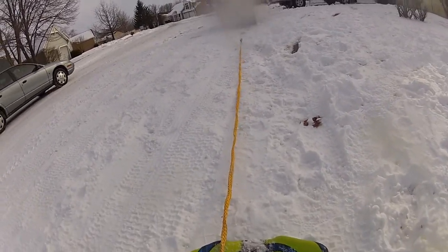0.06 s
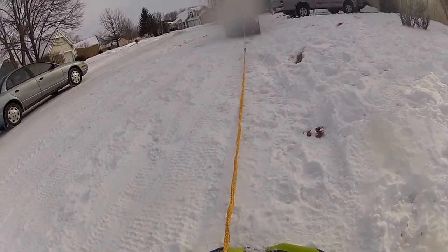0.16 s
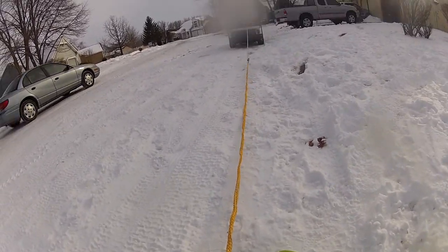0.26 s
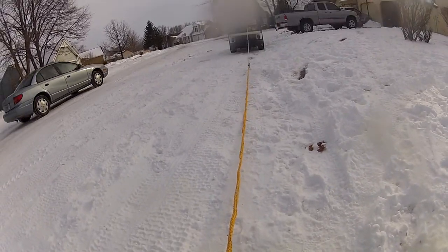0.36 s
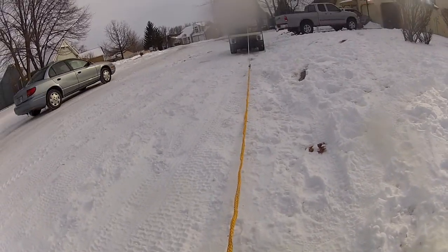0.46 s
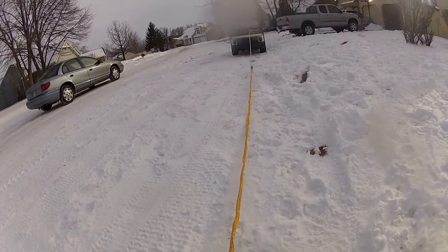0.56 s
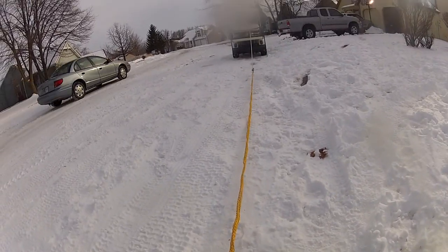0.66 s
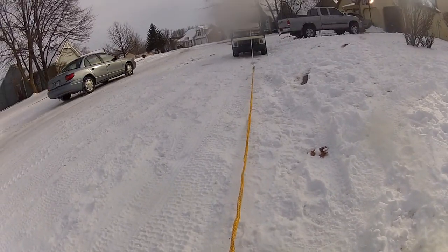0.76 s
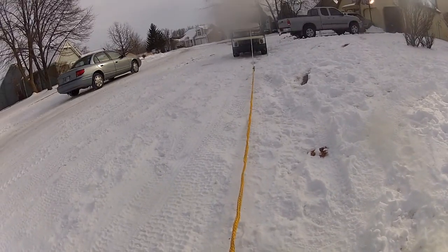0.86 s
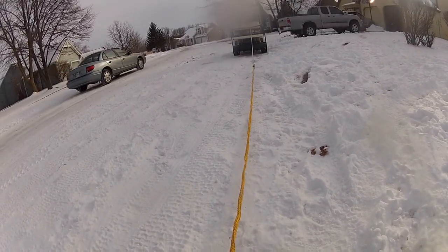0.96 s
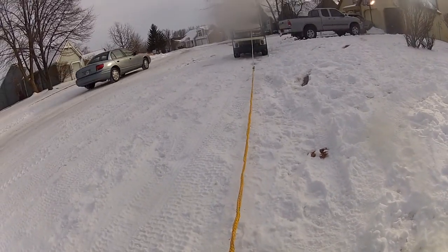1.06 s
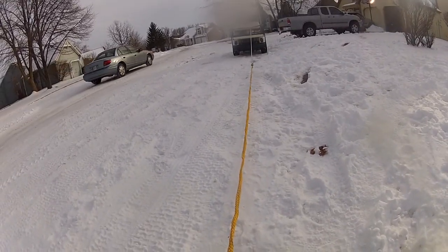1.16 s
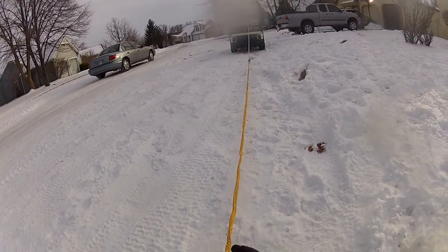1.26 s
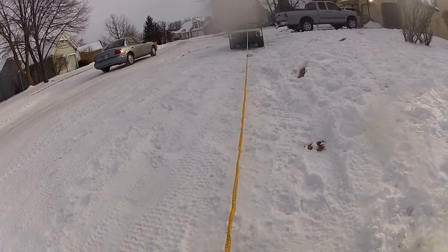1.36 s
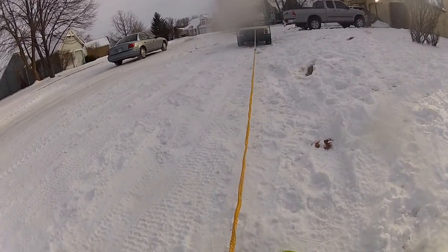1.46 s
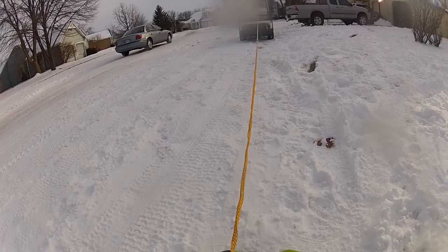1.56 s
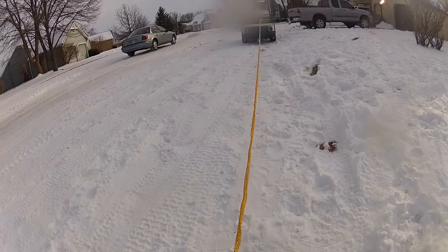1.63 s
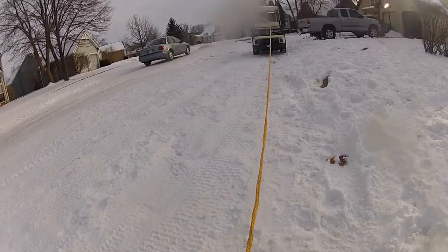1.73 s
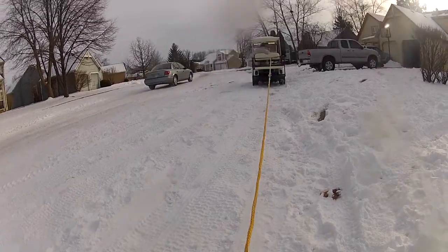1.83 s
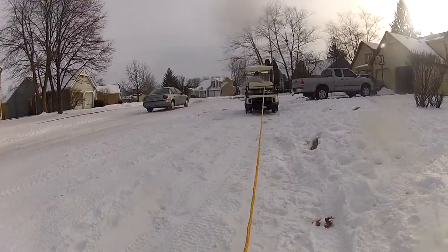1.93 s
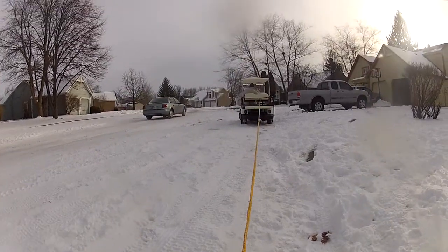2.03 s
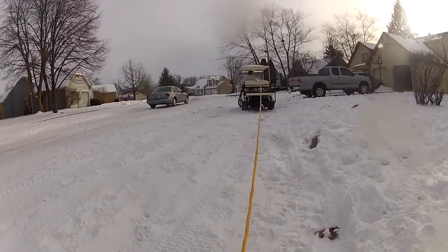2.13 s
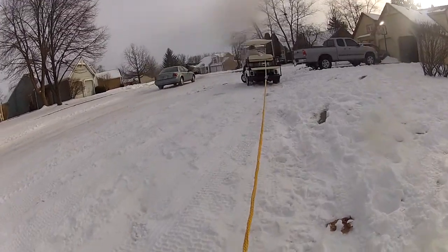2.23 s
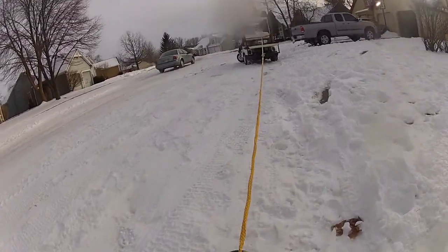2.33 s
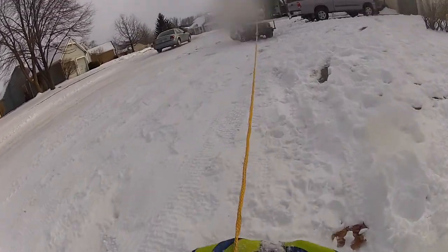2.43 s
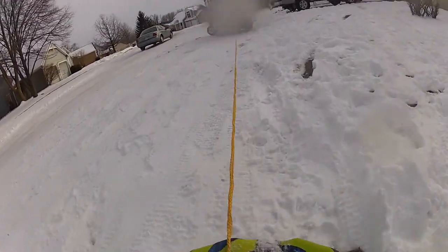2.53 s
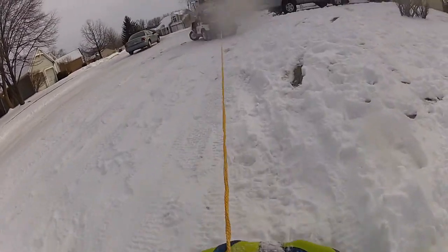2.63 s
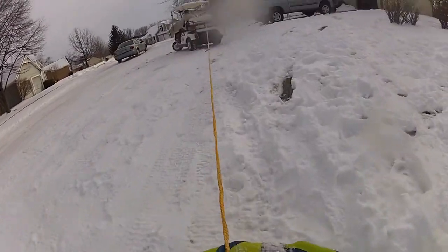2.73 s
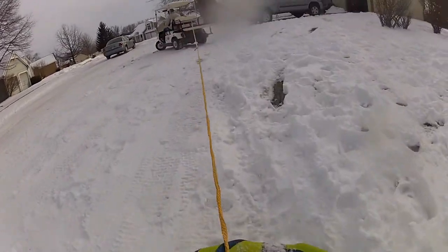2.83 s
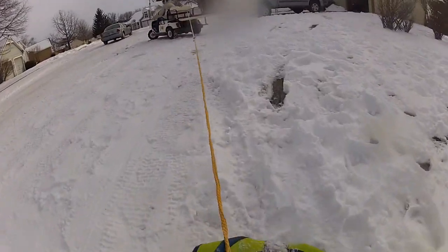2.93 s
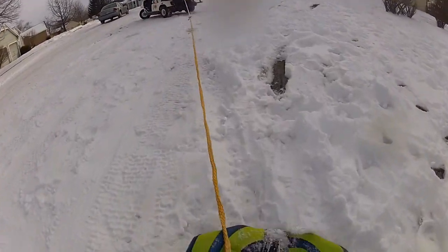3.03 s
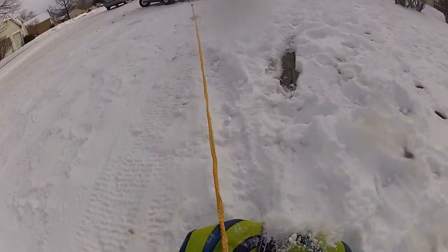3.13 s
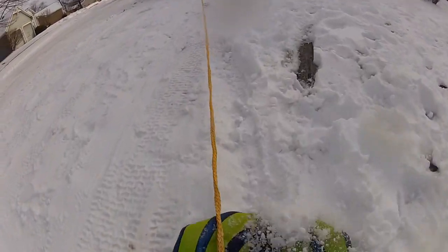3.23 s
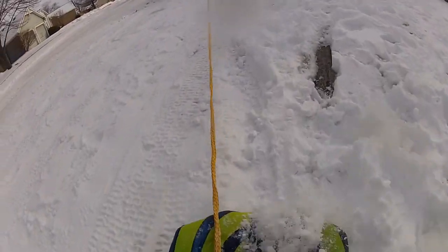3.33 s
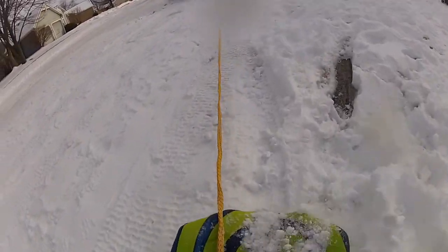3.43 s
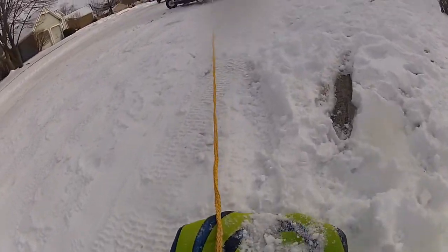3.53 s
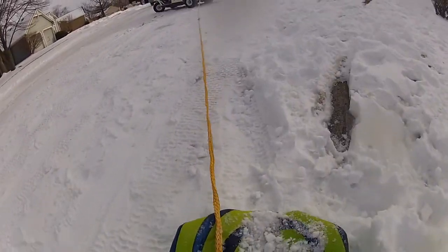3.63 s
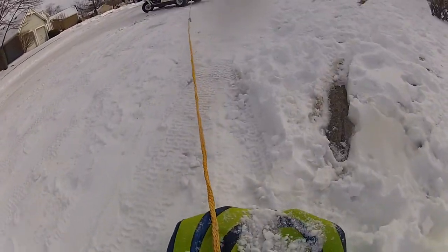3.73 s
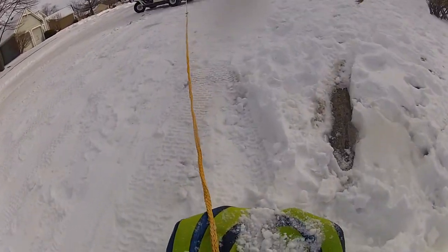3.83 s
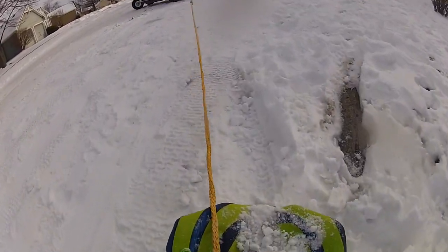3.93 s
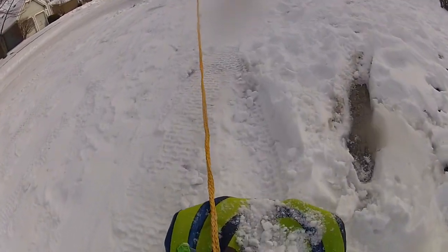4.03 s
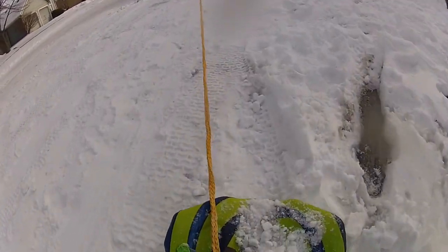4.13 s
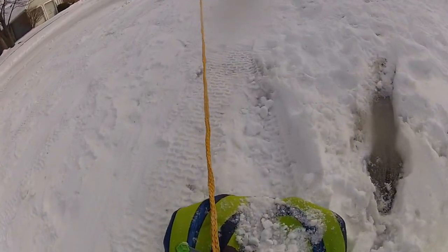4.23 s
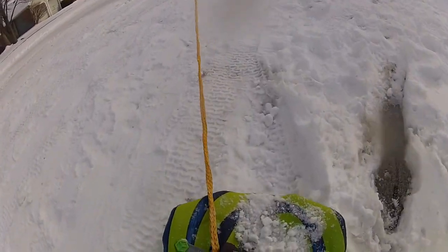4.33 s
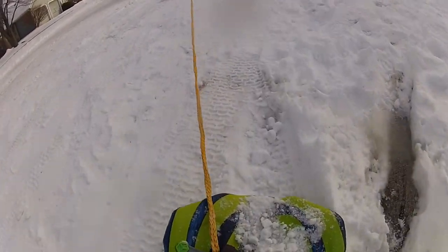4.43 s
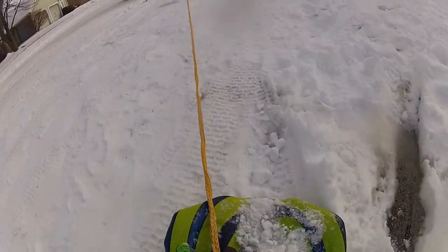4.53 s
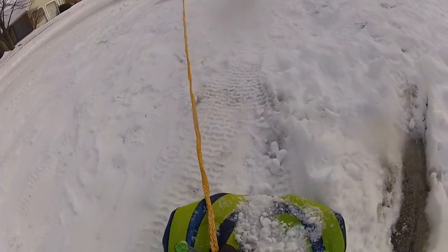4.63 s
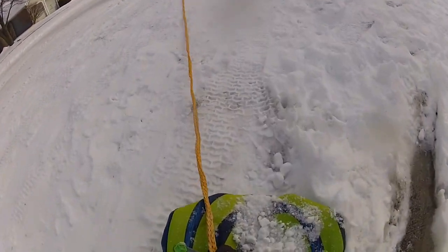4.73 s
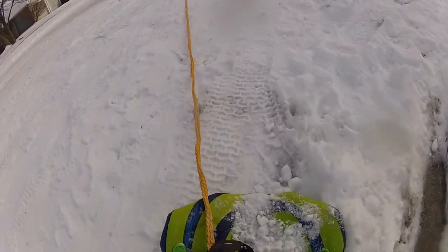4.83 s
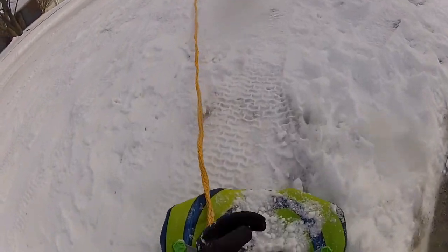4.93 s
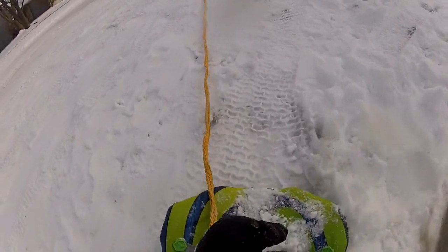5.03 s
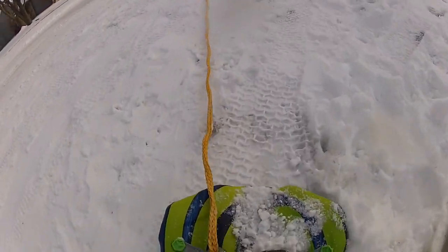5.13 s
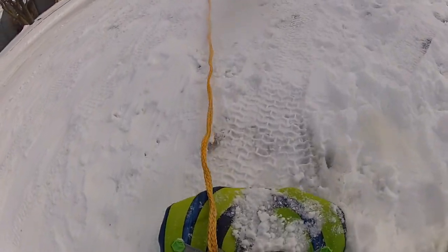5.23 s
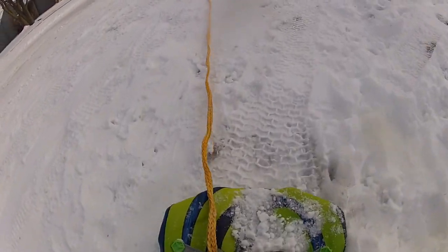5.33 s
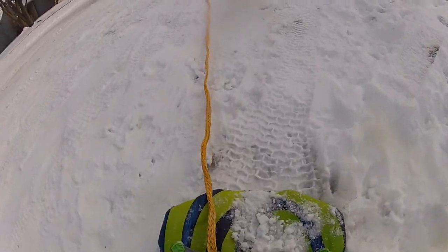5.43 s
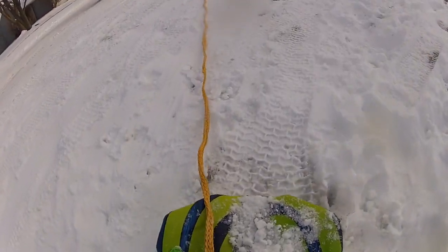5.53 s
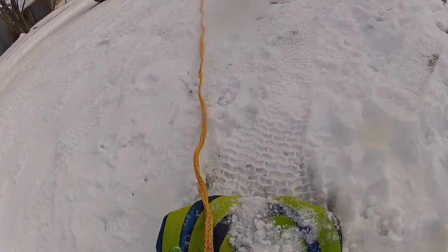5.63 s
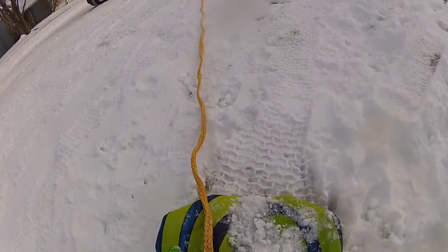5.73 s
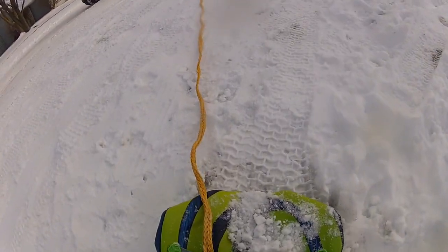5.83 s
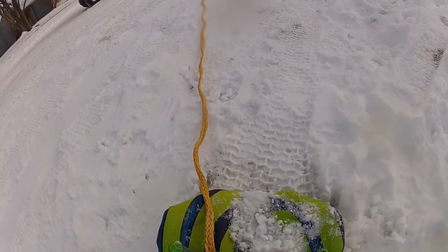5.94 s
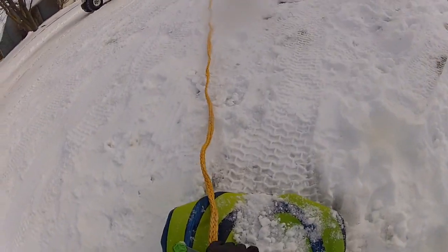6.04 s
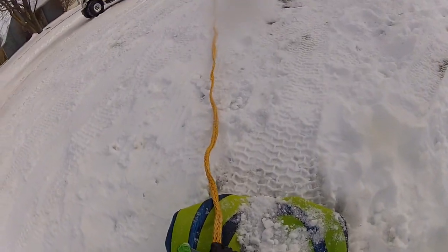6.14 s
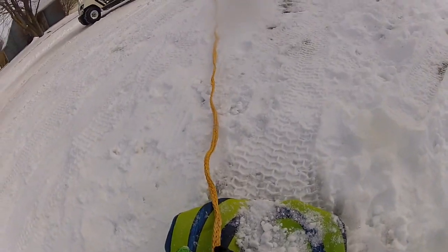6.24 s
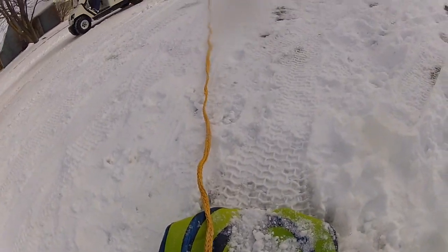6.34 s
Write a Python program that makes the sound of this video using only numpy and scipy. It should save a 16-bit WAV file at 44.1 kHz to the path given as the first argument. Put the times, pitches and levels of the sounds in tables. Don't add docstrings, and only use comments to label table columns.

```python
import sys
import numpy as np
from scipy import signal
from scipy.fft import rfft, irfft, next_fast_len
from scipy.io import wavfile
from scipy.ndimage import uniform_filter1d, map_coordinates

SR = 44100
rng = np.random.default_rng(int(sys.argv[2]) if len(sys.argv) > 2 else 0)


def to_wav(s):
    ch = np.atleast_2d(s).T
    pcm = np.round(np.clip(ch, -1, 1) * 32767)
    wavfile.write(sys.argv[1], SR, pcm.astype(np.int16))


def magnitude_from_level(level_db):
    exponent = np.asarray(level_db, float) / 20
    return 10 ** exponent


N = 281799

# t/s, load on the hull level/dB, loose spray over it level/dB, share of crust [0-1]
SLIDE = [(0.0, -44, -14, 0.8), (0.45, -50, -17, 1), (0.9, -51.5, -32, 0.2), (1.6, -44, -16, 0.64),
         (1.79, -27, -20.5, 0.53), (1.84, -25.5, -14, .1), (2.372, -24, -13.5, 0.31),
         (2.606, -27, -17, 0.98), (2.9, -21.5, -22, 0.53), (3.02, -26, -23, 0.85),
         (3.05, -21.5, -18.5, 0.25), (3.27, -16.5, -14.5, 0.21), (3.45, -27.5, -12.5, 0.3),
         (4.3, -28, -18, 1), (5.03, -27.5, -12.5, 0.3), (5.49, -27, -14, 0.9), (5.81, -36.5, -14.5, 0.63),
         (5.86, -42, -20.5, 0.7)]
# f/Hz, width/Hz, level/dB
CASE = [
    [(405, 140, 2.5), (690, 270, 1)],
    [(1220, 65, 2.5)],
    [(1870, 140, -1), (2830, 600, -8)],
    [(3758, 173, 0.5), (5060, 180, -13)],
]
# f/Hz, width/Hz, level/dB
LINGER = [(1310, 30, -4), (1990, 34, -3)]
CLOD_CYCLES = 0.84


def unit(x):
    return x / np.sqrt(np.mean(x ** 2) + 1e-20)


def curves(rows):
    s, *cols = np.transpose(rows)
    return [np.interp(np.arange(N) / SR, s, c) for c in cols]


def wobble(rate):
    return map_coordinates(rng.standard_normal(int(N * rate / SR) + 4), [np.arange(N) * rate / SR])


def filtered(x, response):
    m = next_fast_len(N + 8192)
    return irfft(rfft(x, m) * response(np.fft.rfftfreq(m, 1 / SR)), m)[:N]


def coloured(x, points):
    hz, db = np.transpose(points)
    return unit(filtered(x, lambda f: magnitude_from_level(np.interp(np.log(f + 1), np.log(hz), db))))


def resonant(x, modes):
    def response(f):
        total = 0
        for k, (hz, width, db) in enumerate(modes):
            total = total + (-1) ** k * magnitude_from_level(db) * 1j * f * width / (hz * hz - f * f + 1j * f * width)
        return total
    return filtered(x, response)


def highpass(f, hz, order):
    return (f / hz) ** order / (1 + (f / hz) ** order)


def grit(per_s, spread_db):
    chance, sign, size = rng.random((3, N))
    return (chance < per_s / SR) * np.sign(sign - .5) * magnitude_from_level(-spread_db * np.log(size + 1e-2))


def patchy(x, depth_db):
    z = signal.stft(x, nperseg=512)[2]
    field = uniform_filter1d(rng.standard_normal(z.shape), size=7, axis=0)
    field = uniform_filter1d(field, size=9, axis=1)
    return unit(signal.istft(z * magnitude_from_level(depth_db * unit(field)), nperseg=512)[1][:N])


def slide():
    # f/Hz, level/dB per Hz
    hull = [(35, -56), (60, -16), (119, -9), (184, -1.5), (296, 2.5), (403, 1), (593, 0), (930, -20.5),
            (1300, -27), (1690, -56), (2860, -120)]
    # f/Hz, level/dB per Hz
    loose_snow = [(470, -9.5), (800, 1.5), (915, -8), (1230, -11), (1420, -14.5), (2300, -9.5), (2480, -6),
                  (2890, -3.5), (3250, -6), (4860, -11.5), (5950, -17), (7740, -60), (13100, -120)]
    # f/Hz, level/dB per Hz
    rutted_crust = [(470, -27), (800, -3.5), (1070, -8.5), (1360, -9), (1620, -9), (1880, -6), (3280, -8.5),
                    (3570, -7), (4180, -21), (5380, -17.5), (5950, -35.5), (7740, -54), (13100, -120)]
    rumble_db, spray_db, crust = curves(SLIDE)
    hard_db = -2.5 + 2 * crust
    hiss_db = rumble_db + spray_db
    chatter = wobble(21.84)

    drum = unit(grit(per_s=480, spread_db=1.76)) + .5 * rng.standard_normal(N)
    drum_db = 0.62 * np.tanh(chatter) + 1.52 * np.tanh(wobble(60))
    rumble = coloured(drum * magnitude_from_level(drum_db), hull)
    boom = filtered(rumble, lambda f: 1 / (1 + (f / 420) ** 4))
    rumble = magnitude_from_level(-.5 * hard_db) * boom + magnitude_from_level(hard_db) * (rumble - boom)

    def crunch():
        grains = .5 * unit(grit(per_s=2300, spread_db=11.0)) + rng.standard_normal(N)
        return grains * magnitude_from_level(0.2 * chatter + 1.36 * wobble(35))

    hiss = np.sqrt(1 - crust) * coloured(crunch(), loose_snow) + np.sqrt(crust) * coloured(crunch(), rutted_crust)
    return magnitude_from_level(rumble_db - 0.07) * rumble + magnitude_from_level(hiss_db + 2.5) * patchy(hiss, depth_db=1.85)


def lumps():
    # t/s, peak level/dB, thud f/Hz, length [cycles]
    hard_lumps = [(1.804, -12, 382, 0.71), (2.324, 0.5, 320, .65), (2.359, -7, 284, .94),
                  (2.662, 0, 312, 0.39), (2.701, -4.5, 388, 0.59), (2.777, 4, 270, 0.84),
                  (2.922, -7.5, 426, 1), (3.124, 3, 310, 0.64), (3.19, -1.5, 330, 0.91),
                  (3.219, -8, 402, 1), (3.284, -5, 380, .6), (3.402, -8.5, 256, 1), (3.621, -2, 360, 0.99),
                  (3.716, -9.5, 347.5, 0.89), (4.038, -5.5, 318, 0.38), (4.177, 5, 387, 0.57),
                  (4.199, -3.5, 344, 0.91), (4.242, -7, 295, 0.75), (4.314, -3.5, 370, 0.49),
                  (4.382, -6.5, 302, 0.88), (4.43, 0, 500, 0.64), (4.542, -1, 305, 0.83),
                  (4.765, -1, 290, 0.38), (4.861, 3.5, 390, 0.88), (4.92, -8.5, 484, 1),
                  (4.989, -8.5, 254, 1), (5.166, -1, 315, 0.2), (5.502, -6.5, 525, 1),
                  (5.592, -3, 675, 0.69), (6.213, -18, 486, 0.55)]
    # t/s, peak level/dB, thud f/Hz
    clods = [(1.527, -21.5, 306), (1.702, -17, 306), (1.909, -12, 298), (2.158, -9.5, 408),
             (2.276, -9, 251), (2.395, -10.5, 378), (2.536, -18, 249), (2.623, -7.5, 416),
             (2.729, -8.5, 373), (2.818, -11.5, 349), (3.018, -9.5, 325), (3.224, -7, 190),
             (3.26, -17, 390), (3.308, -7, 260), (3.659, -9, 335), (3.774, -11.5, 305), (3.812, -9, 326),
             (3.863, -11, 208), (4.14, -12.5, 544), (4.673, -16, 474), (4.695, -12.5, 245),
             (4.812, -12, 483), (4.953, -13.5, 272), (5.016, -9.5, 551), (5.213, -11.5, 500),
             (5.246, -16, 530), (5.373, -13, 275), (5.427, -16.5, 280), (5.523, -13.5, 241),
             (5.811, -16.5, 341)]
    thuds, jolt, snap = np.zeros((3, N + SR))
    lead = SR // 100
    t = np.arange(-lead, SR // 30) / SR
    after = t - .004
    for s, db, hz, cycles in hard_lumps + [row + (CLOD_CYCLES,) for row in clods] + crumbs(count=70):
        u = after * hz / max(cycles, .2)
        ring = 0.42 * np.exp(-u ** 2) + 0.13 * np.exp(-np.abs(u) / 3.2)
        shape = np.where(u < 0, np.exp(-(2.13 * u) ** 2), ring)
        swing = shape * np.cos(2 * np.pi * hz * after * (1.1 - 14 * t) + 2.62)
        here = slice(round(s * SR) - lead, round(s * SR) - lead + len(t))
        thuds[here] += magnitude_from_level(db + 2.5) * swing
        jolt[here] += magnitude_from_level(2 * min(db, 6) - 22) * np.exp(-((t - .0065) / 0.0013) ** 2)
        snap[here] += magnitude_from_level(2.2 * db - 30) * np.exp(-(after / 0.0024) ** 2)
    crush = resonant(snap[:N] * rng.standard_normal(N), [(1400, 890, -1.5), (4400, 3000, -7.5)])
    thuds = filtered(thuds[:N], lambda f: highpass(f, 110, 3) / (1 + (f / 950) ** 6))
    return jolt[:N] + crush + thuds


def crumbs(count):
    jitter, scatter = rng.random(count), rng.standard_normal((count, 2))
    s = (np.arange(count) + .5 + .5 * jitter) * (N / SR) / count
    load_db = np.interp(s, *np.transpose(SLIDE)[:2])
    db = np.minimum(load_db + 8.5 + scatter[:, 0], -13)
    hz = 310 * np.exp(0.33 * np.tanh(scatter[:, 1]))
    return [(a, b, c, CLOD_CYCLES) for a, b, c in zip(s, db, hz)]


def scratches():
    # t/s, rub level/dB, place (below 0 toward the wall, above 0 toward
    # the door), knock level/dB, length/s
    contacts = [(0.0577, -40, 0.5, -5, 0.12), (0.0654, -24.5, -3.3, -6.5, 0.04),
                (0.1276, -15.5, 0.82, -5, .028), (0.151, -28, -6, -3, 0.029), (0.185, -21, 0.3, -6, 0.035),
                (0.2243, -27, 0.3, -7, 0.058), (0.2623, -21, 1, -1, 0.035), (0.2843, -32.5, -1.5, -5, 0.047),
                (0.307, -33.5, -0.7, -1, 0.033), (0.318, -28.5, 0.17, -8, 0.092),
                (0.3557, -29.5, 0.17, -12, 0.048), (0.477, -21.5, 0.88, -1.5, 0.026),
                (0.5525, -39.5, 1.6, -7, 0.019), (0.604, -17, 0.77, -4, 0.026), (0.631, -45, -3, 3, 0.11),
                (0.6624, -35, -1.2, -13, 0.035), (0.9728, -21.5, 0, -10, 0.02),
                (0.9818, -12.5, 1, -18.5, 0.021), (1.121, -53.5, -18, 5, .074),
                (3.344, -45.5, 4, -22, 0.08), (4.255, -39, 0, 10.5, 0.12), (4.387, -33.5, -2.5, -7, 0.035),
            (4.564, -33.5, -4, 3, 0.053), (4.6244, -39, -1, -9, .022), (4.675, -38.5, -3, 15.5, 0.022),
            (5.378, -34, 0.8, 3, 0.027), (5.425, -18, -0.3, 1.5, 0.02), (5.437, -15.5, 0.95, -12, 0.039),
            (5.462, -36, 0.85, -9, 0.19), (5.495, -29, 0.6, 1.5, .059), (5.534, -23.5, 0.65, -14, 0.017),
            (5.5953, -2.5, 1.18, -12, 0.012)]
    rub = np.zeros((5, N + SR))
    t = np.arange(SR // 8) / SR
    for s, db, place, knock_db, length in contacts:
        wall_db, door_db = 17.5 - 0.5 * place, 13 + 7 * place
        parts_db = np.array([knock_db + 21.5, wall_db, 17, door_db, 5])
        burst = (1 - np.exp(-t / 0.0013)) * magnitude_from_level(-60 * t / max(length, .005)) * rng.standard_normal((5, len(t)))
        burst[4] *= magnitude_from_level(-60 * t / .006)
        start = round(s * SR)
        rub[:, start:start + len(t)] += magnitude_from_level(db + parts_db)[:, None] * burst
    body, wall, frame, door, touch = rub[:, :N]
    direct = filtered(frame + door, lambda f: 0.044 * highpass(f, 900, 2))
    crack = resonant(touch, [(5030, 3000, 6)])
    linger = resonant(wall, LINGER[:1]) + resonant(frame, LINGER[1:])
    ringing = sum(resonant(x, modes) for x, modes in zip((body, wall, frame, door), CASE))
    return direct + crack + linger + ringing


def engine():
    # t/s, beat f/Hz, level/dB
    revs = [(0.0, 49.2, -36), (0.75, 51.92, -36.5), (1.1, 49.36, -36.5), (1.51, 50.06, -36),
            (1.83, 56.17, -35.5), (2.1, 50.4, -40), (2.8, 51.65, -40.5), (3.6, 49.87, -41.5),
            (5.3, 49.35, -45), (6.39, 48.3, -45.5)]
    # multiple of the beat, level/dB
    orders = [(1, 0), (2, -3), (3, -9), (4, -3), (6, -12)]
    # f/Hz, level/dB per Hz
    drone = [(18, -25), (30, 5), (59, 6), (195, -1.5), (404, -15.5), (670, -15.5), (996, -35), (1360, -30),
             (1550, -38), (2510, -41), (3730, -41), (5800, -51), (7540, -82.5), (12800, -120)]
    # t/s, peak level/dB
    puffs = [(0.7694, -58), (0.856, -44), (0.946, -37), (1.0345, -41), (1.2032, -40), (1.284, -38),
             (1.3577, -38.5), (1.4253, -34.5), (1.5, -47), (1.5697, -52), (5.888, -60), (6.1355, -58),
             (6.197, -39)]
    beat_hz, level_db = curves(revs)
    turns = np.cumsum(beat_hz * (1 + .012 * wobble(10))) / SR
    tones = np.zeros(N)
    for k, db in orders:
        tones += magnitude_from_level(db + 2.5 * wobble(9)) * np.sin(2 * np.pi * k * turns + k * k)

    murmur = coloured(magnitude_from_level(2.15 * wobble(25)) * rng.standard_normal(N), drone)
    murmur = filtered(murmur, lambda f: highpass(f, 55, 3))

    firing, t = np.zeros(N), np.arange(SR // 10) / SR
    for s, db in puffs:
        firing[round(s * SR):][:len(t)] += magnitude_from_level(db - 15.5 - 60 * t / 0.089) * rng.standard_normal(len(t))
    clatter = filtered(firing, lambda f: highpass(f, 900, 2) / (1 + f / 4000))
    clatter = clatter + 1.6 * resonant(firing, CASE[1] + LINGER[:1])
    return magnitude_from_level(level_db) * (0.63 * unit(tones) + 1.15 * murmur) + 3.4 * clatter


def scene():
    return (scratches() + lumps() + engine() + slide())[None]


def ducked(x, top, duck_db, recover_s):
    t = np.arange(SR // 5) / SR
    recovery = (t > .004) * np.exp(-t / recover_s)
    over = signal.fftconvolve(1.0 * (np.abs(x) > top), recovery)[:N]
    return x * magnitude_from_level(-duck_db * np.tanh(over / 40))


def held(x, rate, top):
    samples = np.clip(signal.resample_poly(x, rate, SR), -top, top)
    out = signal.resample_poly(np.repeat(samples, 4), SR, 4 * rate)[:N]
    return np.pad(out, (0, N - len(out)))


def starved(x, depth_db, click_db, top_db, top_hz):
    hz, _, z = signal.stft(x, SR, nperseg=1536)
    power = (np.abs(z[:768]) ** 2).reshape(64, 12, -1).mean(axis=1)
    band_db = 10 * np.log10(power + 1e-20)
    keep = band_db > np.median(band_db[8:44], axis=0) - depth_db
    click = band_db > uniform_filter1d(band_db, size=21, axis=1) + click_db
    keep[32:38] |= click[8:20].any(axis=0)
    keep[38:] &= band_db[38:] > -99
    gain = np.where(hz[6:768:12, None] > top_hz, magnitude_from_level(top_db) * click, keep)
    z[:768] *= np.repeat(gain, 12, axis=0)
    return signal.istft(z, SR, nperseg=1536)[1][:N]


def roll_off(x):
    return signal.sosfilt(signal.butter(12, 16480, fs=SR, output="sos"), x)


def record(dry):
    out = ducked(dry[0], top=.71, duck_db=6, recover_s=.03)
    out = held(out, rate=12000, top=.71)
    out = starved(out, depth_db=7, click_db=9, top_db=-19, top_hz=15300)
    out = filtered(out, lambda f: 1 / (1 + (f / 16000) ** 60))
    return roll_off(out[None])


dry = scene()
out = record(dry)
to_wav(out)
```